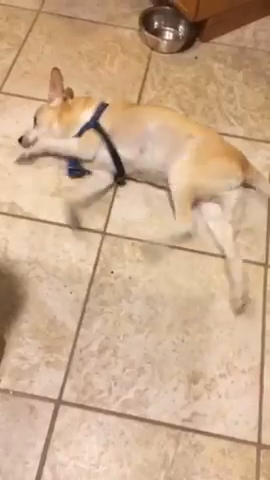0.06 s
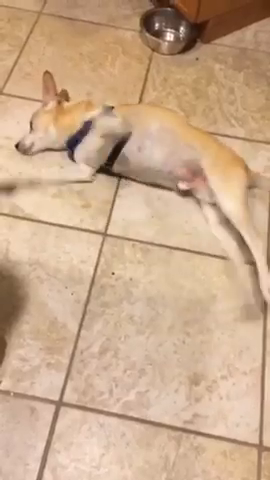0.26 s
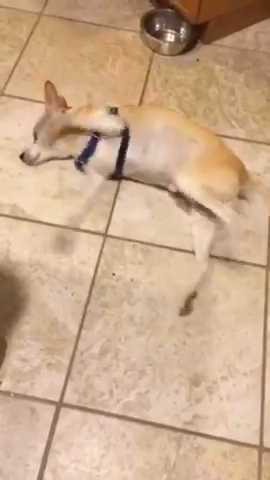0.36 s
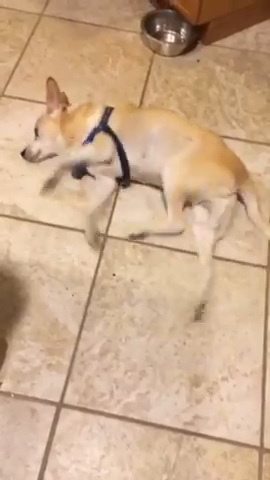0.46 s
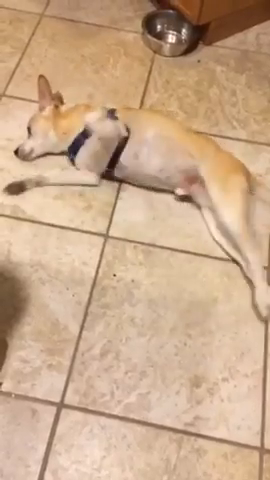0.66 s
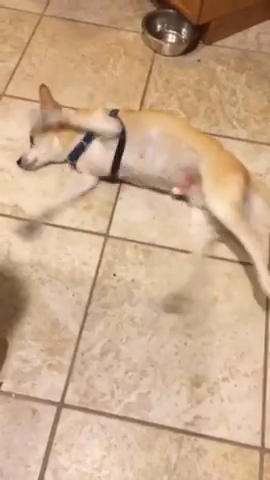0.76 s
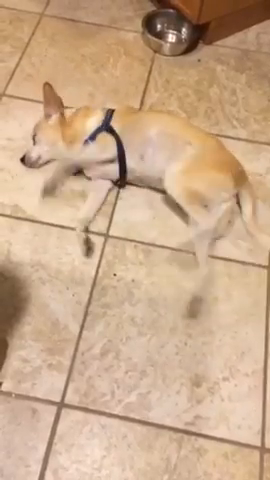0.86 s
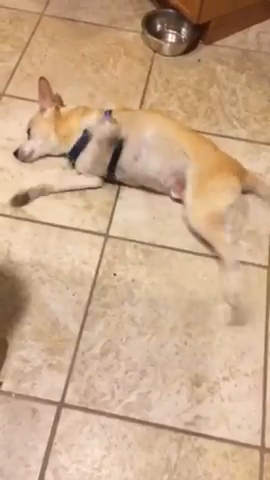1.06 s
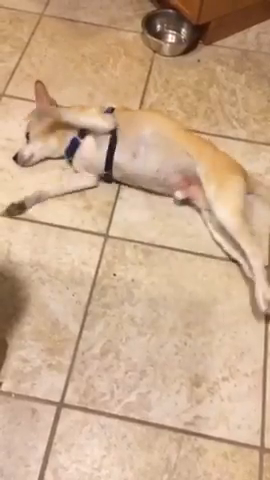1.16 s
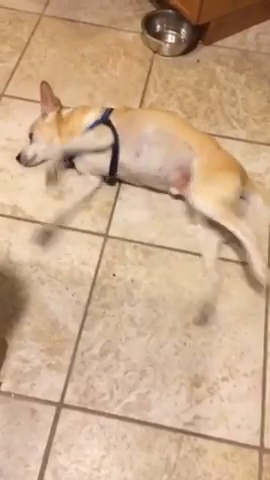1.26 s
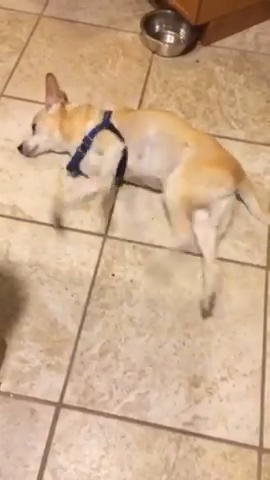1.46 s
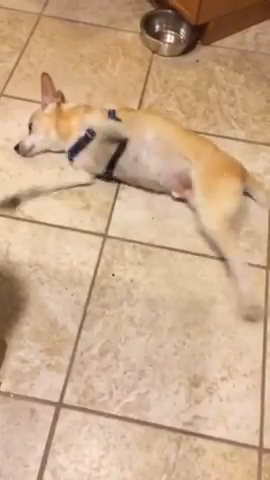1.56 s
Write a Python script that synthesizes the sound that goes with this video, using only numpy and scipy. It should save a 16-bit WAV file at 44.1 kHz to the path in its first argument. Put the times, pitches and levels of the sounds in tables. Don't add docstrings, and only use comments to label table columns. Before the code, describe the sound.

Dog claws scrabbling on kitchen tile, a loud crack with a faint metallic ring, then lighter scrapes

```python
import sys
import numpy as np
from scipy import signal
from scipy.io import wavfile

SR = 44100
rng = np.random.default_rng(int(sys.argv[2]) if len(sys.argv) > 2 else 0)


def gain_from_db(level_db):
    decades = np.asarray(level_db, float) / 20
    return 10 ** decades


def waveform_to_disk(signal):
    frames = np.transpose(np.atleast_2d(signal))
    scaled = np.clip(frames, -1, 1) * 32767
    samples = np.round(scaled).astype(np.int16)
    wavfile.write(sys.argv[1], SR, samples)


N = 70560

# (time [s], length [s])
SKID_SPANS = [(0, .012), (.058, .052), (.113, .027), (.166, .006), (.181, .03), (.456, .02), (.551, .036),
              (.615, .04), (.842, .028), (.978, .03), (1.02, .032), (1.083, .056), (1.212, .03),
              (1.468, .044), (1.5525, .035)]
# (level [dB rms], claw resonance [Hz], glaze hiss [dB])
SKID_TONES = [(-55, 6800, -37), (-55.5, 2630, -21), (-52.5, 8200, -12), (-39.5, 7500, -4), (-45, 6600, -7),
              (-55.5, 3000, -28), (-46, 6000, -2.5), (-50.5, 6000, -1), (-58.5, 5600, -19),
              (-64, 1940, -25), (-50.5, 5500, -6), (-52.5, 4200, 3.5), (-85, 4000, -22), (-51, 5700, 3),
              (-52.5, 6300, 1)]
# (time [s], level [dB])
DRAG_CURVE = [(0.0, -58), (0.182, -64.5), (0.404, -60.5), (0.53, -58), (0.65, -75), (0.836, -64),
              (1.06, -71), (1.282, -69.5), (1.5, -66), (1.6, -61)]
# (frequency [Hz], density [dB per Hz])
FUR_SPECTRUM = [(410, -66), (700, -5), (2070, 5), (4930, 1), (5470, 6.5), (13400, -7), (15400, -18)]
# (time [s], level [dB])
SHIFT_CURVE = [(0.0, -56), (0.2, -61), (0.226, -49), (0.248, -48), (0.284, -52), (0.352, -61),
               (0.578, -55.5), (0.61, -55), (0.646, -53), (0.766, -62.5), (0.882, -63.5), (0.998, -54.5),
               (1.35, -65), (1.488, -54), (1.554, -61.5), (1.6, -56)]
# (frequency [Hz], density [dB per Hz])
RUMBLE_SPECTRUM = [(15, -54), (25, -23), (44, -3.5), (109, -6.5), (198, 0), (244, -15), (306, -17),
                   (628, -16.5), (900, -15.5), (1170, -37), (1980, -120)]
# (frequency [Hz], level [dB], t60 [s])
LOW_MODES = [(163.7, -14, 0.43), (206.4, -2, 0.21), (308.7, 4.5, 0.078), (424, -9.5, 0.31),
             (463, -1.5, 0.05)]
# (frequency [Hz], density [dB per Hz])
HUM_SPECTRUM = [(410, -54), (700, -30), (1250, -11), (1350, 4), (1750, -21), (15400, -10.5)]
# (time [s], peak [dB], centre [Hz], chatter length [s])
CLAW_TAPS = [(.0203, -35, 6500, .006), (.0526, -35, 4000, .005), (.1103, -30.5, 11000, .003),
             (.1638, -24, 6500, .003), (.1792, -19, 8500, .001), (.1855, -32, 9000, .002),
             (.4419, -42, 7000, .005), (.4828, -42, 4200, .005), (.5377, -32, 12000, .0008),
             (.5497, -29.5, 12000, .002), (.575, -37, 6500, .003), (.603, -36, 4500, .005),
             (.6742, -39, 10000, .002), (.6775, -40, 10000, .002), (.712, -54, 1800, .004),
             (.7258, -50, 3300, .005), (.867, -49, 7000, .003), (1.0168, -33.5, 11000, .004),
             (1.094, -39, 6000, .0006), (1.2093, -36, 4800, .0025), (1.465, -34, 9000, .0015),
             (1.4672, -34, 5500, .003), (1.5085, -36, 8000, .002), (1.5245, -42, 10000, .002)]
# (time [s], level [dB], pitch [Hz])
PAW_THUMPS = [
    (0.167, -43, 97),
    (0.228, -31.5, 200),
    (0.245, -31.5, 148),
    (.275, -41.5, 102),
    (0.64, -39.5, 200),
    (.664, -43.5, 148),
    (0.701, -46, 137),
    (0.764, -52, 105),
    (1.471, -43, 121),
    (1.597, -45, 390),
]
# (time [s], peak [dB], metal ring [dB])
HARD_KNOCKS = [
    (.2233, -14.5, -41),
    (.2416, -3.5, -29.5),
]
# (frequency [Hz], level [dB], t60 [s])
TILE_MODES = [(930, -31, .015), (1650, -30, .012), (1250, -31, .01), (4100, -17, .006)]
# (frequency [Hz], level [dB], t60 [s])
METAL_MODES = [(12955, -8, .08), (13215, -14, .07), (13640, -11, .06), (13728, 2, .12), (14600, -19, .2),
               (15100, -10, .06), (15172, -14, .2)]
# (centre [Hz], t60 [s], level [dB])
ROOM_BANDS = [(510, 0.12, -8.5), (1200, 0.25, -5.5), (2540, 0.27, -8), (4700, 0.32, -13), (8300, 0.39, -12),
              (14000, .14, -7)]


def rms_one(x):
    return x / np.sqrt(np.mean(x ** 2) + 1e-20)


def level_curve(rows):
    time_s, level_db = np.transpose(rows)
    return gain_from_db(np.interp(np.arange(N) / SR, time_s, level_db))


def add(out, time_s, x):
    i = int(time_s * SR)
    out[i:i + len(x)] += x[:len(out) - i]


def bandpass(x, low_hz, high_hz):
    return signal.sosfilt(signal.butter(2, [low_hz, high_hz], "band", fs=SR, output="sos"), x)


def resonance(x, hz, width_hz):
    r = np.exp(-np.pi * width_hz / SR)
    poles = [1, -2 * r * np.cos(2 * np.pi * hz / SR), r * r]
    return signal.lfilter([(1 - r * r) / 2, 0, (r * r - 1) / 2], poles, x)


def mode(x, hz, t60_s):
    r = gain_from_db(-60 / (t60_s * SR))
    w = 2 * np.pi * hz / SR
    return signal.lfilter([0, np.sin(w)], [1, -2 * r * np.cos(w), r * r], x + 1e-18)


def modes(x, table):
    return sum(gain_from_db(db) * mode(x, hz, t60_s) for hz, db, t60_s in table)


def flickering_noise(spectrum, flicker_db=1.5):
    hz, db = np.transpose(spectrum)
    edges_hz = np.geomspace(hz[0], hz[-1], int(2 * np.log2(hz[-1] / hz[0])) + 2)
    knots = np.arange(0, N + 900, 900)
    out = 0
    for low_hz, high_hz in zip(edges_hz, edges_hz[1:]):
        flicker = np.interp(np.arange(N), knots, rng.standard_normal(len(knots)))
        band = bandpass(rng.standard_normal(N), low_hz, high_hz)
        band_db = np.interp(np.log(low_hz * high_hz) / 2, np.log(hz), db)
        out = out + band * gain_from_db(band_db + flicker_db * flicker)
    return rms_one(out)


def grains(per_s, spread_db, size):
    chance, height, sign = rng.random((3, size))
    return (chance < per_s / SR) * gain_from_db(-spread_db * np.log(height + 0.0041)) * np.sign(sign - .5)


def claw(x, hz, q, wide_db):
    x = resonance(x, hz, hz / q) + gain_from_db(wide_db) * resonance(x, hz / 2, 1.5 * hz)
    return signal.lfilter(*signal.butter(1, min(2 * hz, 14000), fs=SR), x)


def skids():
    rise_s, fall_s = .002, .012
    glaze_hz, glaze_width_hz, glaze_gain_db = 12000, 3000, 2.5
    out, t = np.zeros(N), np.arange(SR // 6) / SR
    for (time_s, length_s), (db, hz, glaze_db) in zip(SKID_SPANS, SKID_TONES):
        shape = np.clip(t / rise_s, 0, 1) * gain_from_db(-20 * np.maximum(t - length_s, 0) / fall_s)
        claw_grains = grains(13000, spread_db=2.5, size=len(t))
        glaze_grains = grains(13000, spread_db=2.5, size=len(t))
        scrape = claw(claw_grains, hz, q=1.7, wide_db=-7)
        hiss = gain_from_db(glaze_db + glaze_gain_db) * resonance(glaze_grains, glaze_hz, glaze_width_hz)
        knots_s = t[::200]
        lumps = gain_from_db(2 * np.interp(t, knots_s, rng.standard_normal(len(knots_s))))
        add(out, time_s, gain_from_db(db) * shape * lumps * rms_one(scrape + hiss))
    return out


def fur():
    return level_curve(DRAG_CURVE) * flickering_noise(FUR_SPECTRUM)


def body():
    hollow_db, ceiling_db = -4, -54
    rumble = flickering_noise(RUMBLE_SPECTRUM)
    hollow = sum(gain_from_db(db) * mode(rng.standard_normal(N), hz, t60_s) for hz, db, t60_s in LOW_MODES)
    level = np.minimum(level_curve(SHIFT_CURVE), gain_from_db(ceiling_db))
    return level * rms_one(rumble + gain_from_db(hollow_db) * rms_one(hollow))


def hum():
    return gain_from_db(-72.5) * flickering_noise(HUM_SPECTRUM)


def taps():
    out, t = np.zeros(N), np.arange(900) / SR
    for time_s, db, hz, length_s in CLAW_TAPS:
        chatter = grains(12000, spread_db=2.5, size=len(t))
        hit = chatter * (t < length_s) * np.exp(-.6 * t / length_s)
        hit[0] = 1.5
        tap = claw(hit, hz, q=2.2, wide_db=-6)
        add(out, time_s, gain_from_db(db + 3) * tap / np.abs(tap).max())
    return out


def thumps():
    decay_cycles, highpass_ratio, low_modes_db = 8.0, 0.6, -2
    out, pushes = np.zeros(N), np.zeros(N)
    for time_s, db, hz in PAW_THUMPS:
        push = np.zeros(SR // 4)
        soft = np.hanning(int(SR / hz / 2))
        push[:len(soft)] = gain_from_db(db) * soft / soft.sum()
        push = signal.lfilter(*signal.butter(2, highpass_ratio * hz, "high", fs=SR), push)
        add(out, time_s, 1.5 * mode(push, hz, decay_cycles / hz))
        add(pushes, time_s, push)
    return out + gain_from_db(low_modes_db) * modes(pushes, LOW_MODES)


def knocks():
    crack_hz, crack_width_hz = 4100, 2200
    rattle_s, rattle_db = .0025, -17
    out, click = np.zeros(N), np.zeros(SR // 3)
    click[:3] = [.5, 1, .5]
    t = np.arange(len(click)) / SR
    tile = modes(click, TILE_MODES)
    metal = modes(click, METAL_MODES)
    for time_s, db, ring_db in HARD_KNOCKS:
        rattle = grains(15000, spread_db=2.0, size=len(click)) * np.exp(-t / rattle_s)
        hit = click + gain_from_db(rattle_db) * rattle
        crack = resonance(resonance(hit, crack_hz, crack_width_hz), crack_hz, 2 * crack_width_hz)
        crack = crack - gain_from_db(-8) * resonance(hit, 1500, width_hz=1500)
        crack = crack - gain_from_db(-11) * resonance(hit, 7200, width_hz=3000)
        add(out, time_s, gain_from_db(db) * (crack / np.abs(crack).max() + tile) + gain_from_db(ring_db) * metal)
    return out


def room(x):
    gap_s = .003
    t, tail = np.arange(SR // 2) / SR, 0
    hz = np.array(ROOM_BANDS)[:, 0]
    edges_hz = np.r_[hz[0] / 2, np.sqrt(hz[1:] * hz[:-1]), 18000]
    for (_, t60_s, db), low_hz, high_hz in zip(ROOM_BANDS, edges_hz, edges_hz[1:]):
        band = bandpass(rng.standard_normal(len(t)), low_hz, high_hz)
        tail = tail + band * gain_from_db(db - 60 * t / t60_s) / np.sqrt(t60_s * SR / 13.8)
    return signal.fftconvolve(x, tail * np.clip(t / gap_s, 0, 1))[:N]


def scene():
    claws = skids() + taps() + knocks()
    reflections = gain_from_db(5.5) * room(claws)
    return (claws + reflections + fur() + body() + hum() + thumps())[None]


def band_limit(x):
    return signal.sosfilt(signal.butter(12, 16560, fs=SR, output="sos"), x)


def record(dry):
    low_cut_hz, top_cut_hz, stop_db = 45, 15300, 33
    mix = signal.sosfilt(signal.butter(2, low_cut_hz, "high", fs=SR, output="sos"), dry)
    mix = signal.sosfilt(signal.ellip(8, .5, stop_db, top_cut_hz, fs=SR, output="sos"), mix)
    return band_limit(mix)


dry = scene()
out = record(dry)
waveform_to_disk(out)
```